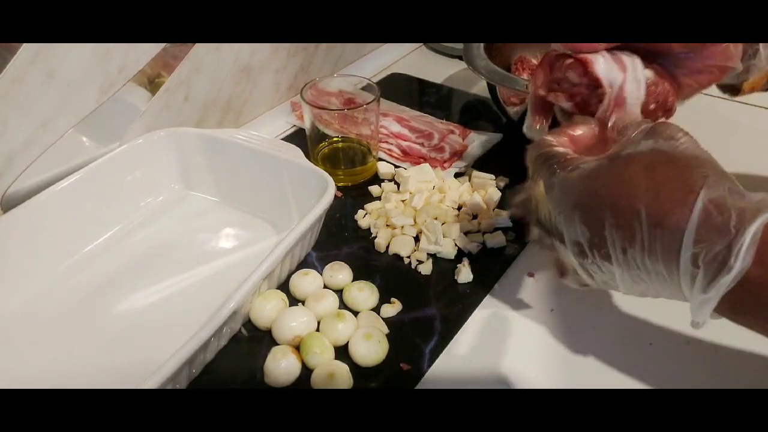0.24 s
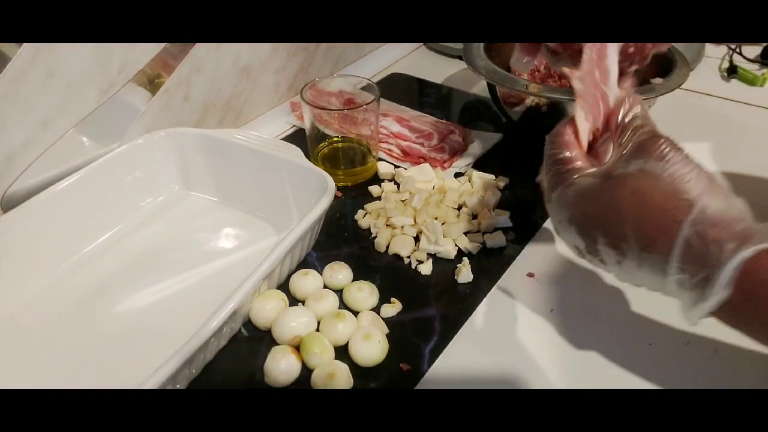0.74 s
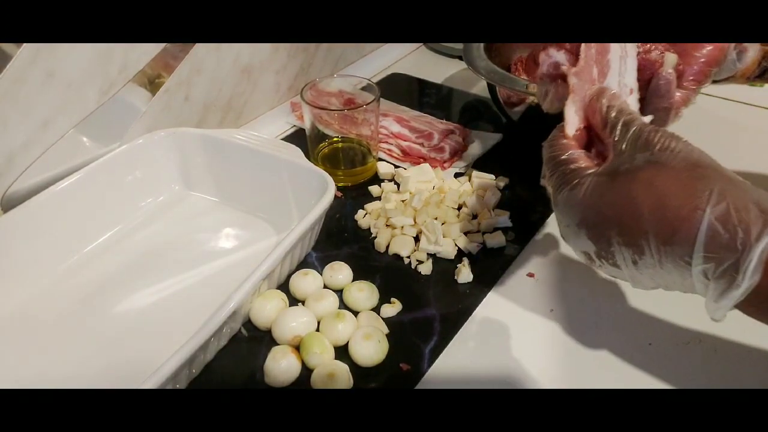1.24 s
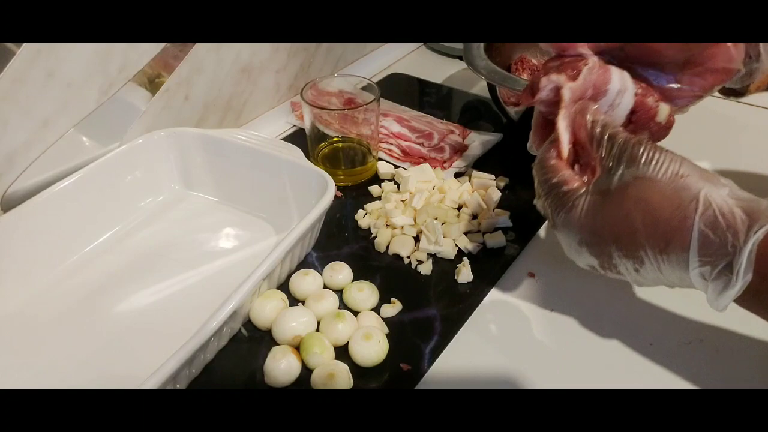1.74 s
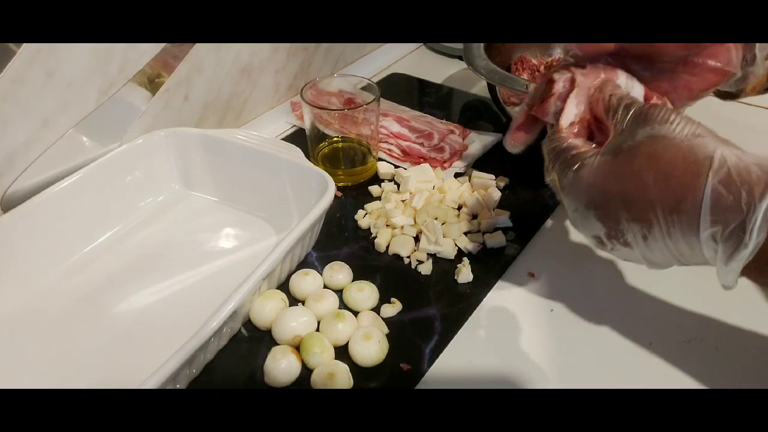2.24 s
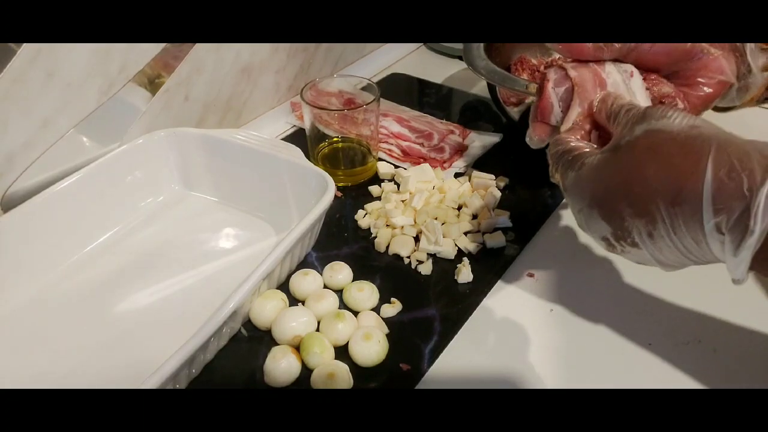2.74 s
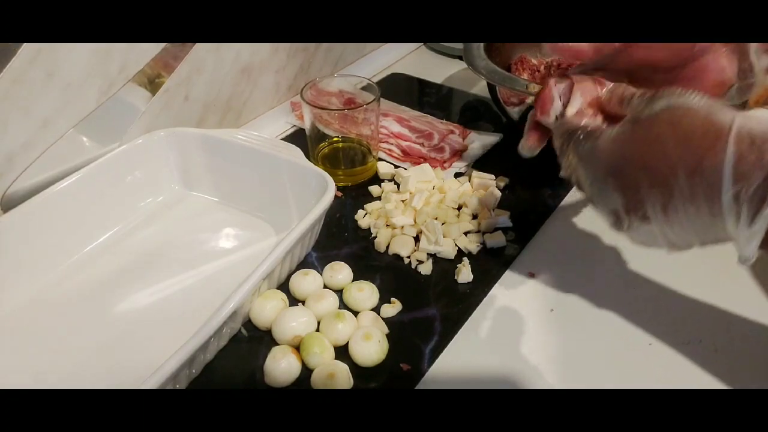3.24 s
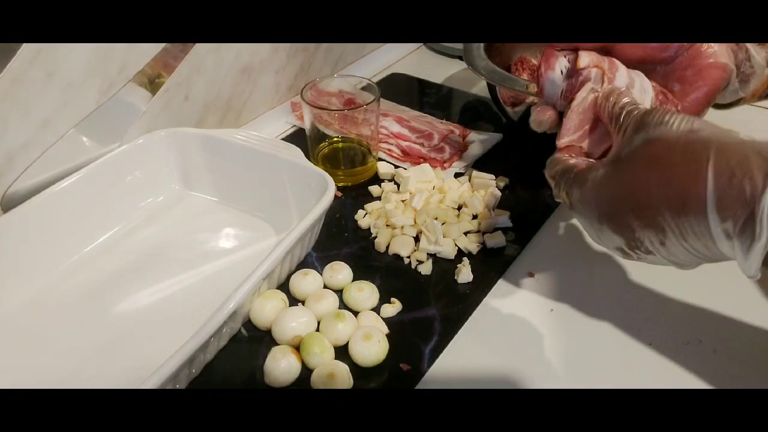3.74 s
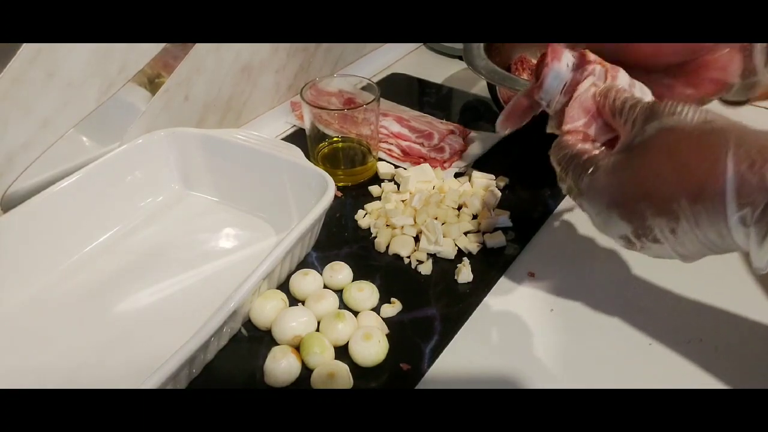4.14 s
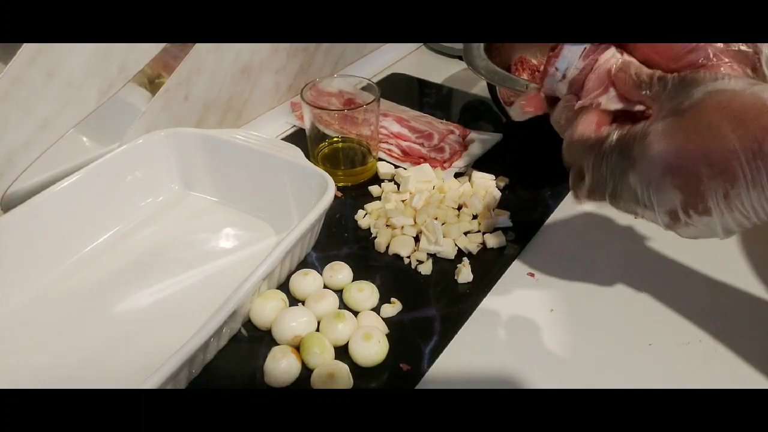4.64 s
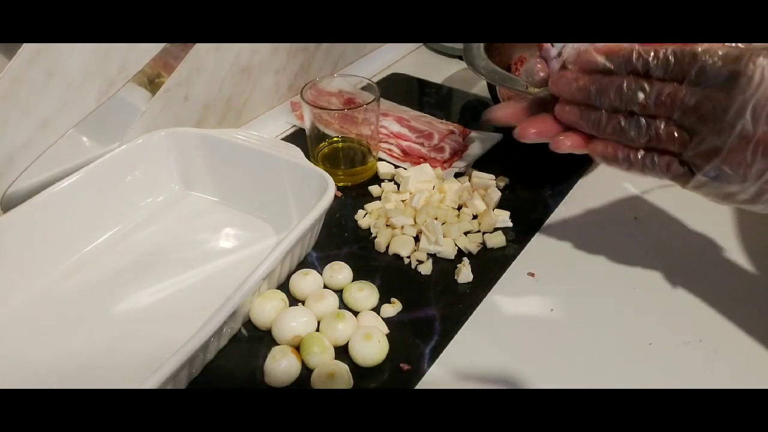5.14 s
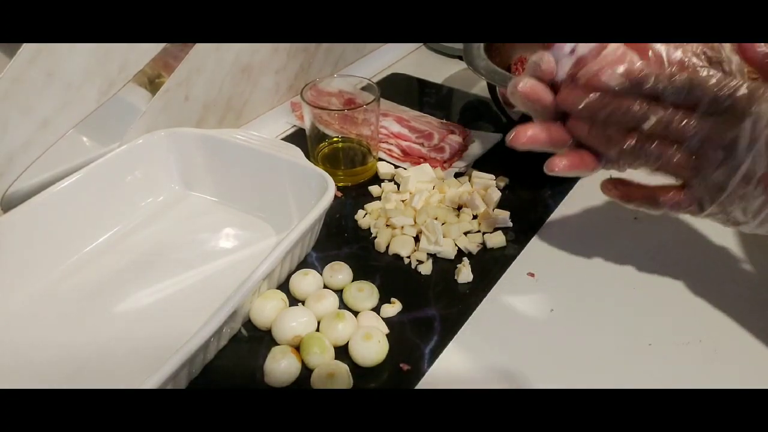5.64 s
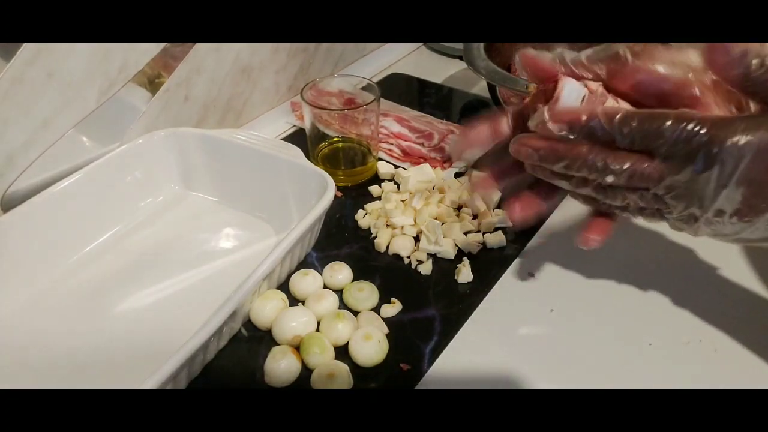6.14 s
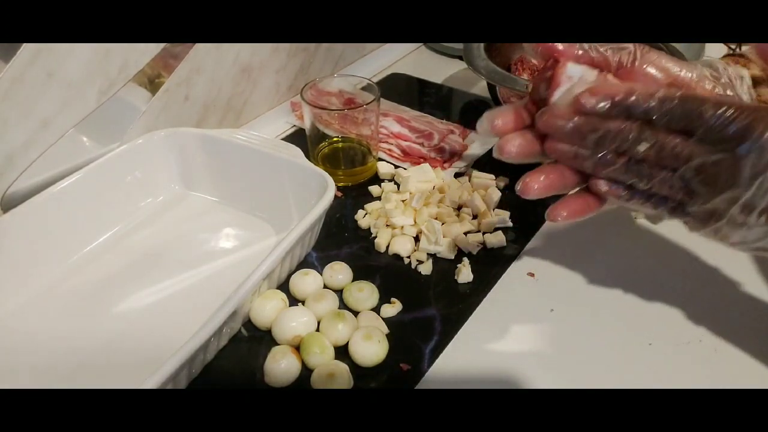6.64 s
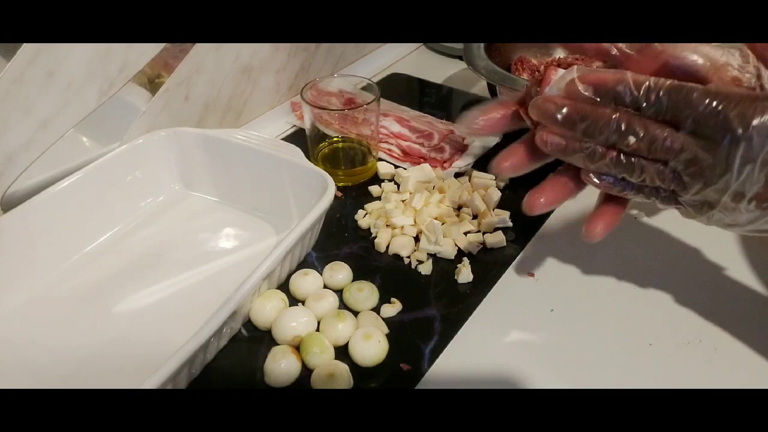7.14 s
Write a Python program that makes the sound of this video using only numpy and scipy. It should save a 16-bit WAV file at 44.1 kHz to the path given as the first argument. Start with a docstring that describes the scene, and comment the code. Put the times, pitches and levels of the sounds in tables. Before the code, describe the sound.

Close, thin disposable gloves crinkle in short irregular bursts as hands work raw meat. Sparse ticks and sharp snaps come first, then denser rustling. Around three seconds a low rumble swells into a muffled double thump through the counter. Busier crackling follows, with faint wet slips and dull palm pats. Small hard kitchen, close stereo microphones, faint hiss.

```python
"""At a kitchen counter, hands in thin plastic gloves press and turn raw meat. The creasing film is made
of swarms of tiny damped sines, with denser bursts for the loud snaps and longer rings for wet squelches.
Soft pats are dull pulses. A rumble, random noise through the counter's resonances, swells to a muffled thump.
Two spaced microphones with unlike treble hear it in a small hard room, over a faint hiss."""
import sys
import numpy as np
from scipy import signal
from scipy.fft import rfft, irfft, next_fast_len
from scipy.io import wavfile
from scipy.ndimage import map_coordinates

SR = 44100
rng = np.random.default_rng(int(sys.argv[2]) if len(sys.argv) > 2 else 0)


def to_wav(sig):
    """Store sig (one row per channel, or 1-D mono) as 16-bit WAV at the path in sys.argv[1].

    Samples outside -1..1 are clipped; the rate is SR.
    """
    pcm = np.clip(np.atleast_2d(sig), -1, 1) * 32767
    pcm = np.round(pcm).astype(np.int16)
    wavfile.write(sys.argv[1], SR, pcm.T)  # frames by channels


N = 326340  # length in samples


def amp(db):
    """Turn dB into a gain."""
    return 10 ** (np.asarray(db) / 20)


def unit(x):
    """Scale a sound to rms 1."""
    return x / np.sqrt(np.mean(x ** 2) + 1e-20)


def along(points, hz):
    """Read a curve of (Hz, value) points on a log frequency axis."""
    f, value = np.transpose(points)
    return np.interp(np.log(hz + 1), np.log(f + 1), value)


def wobble(rate, t):
    """A smooth random curve with `rate` knots a second."""
    return map_coordinates(rng.standard_normal(2000), [t * rate])


def patches(rate, s, octave):
    """A smooth random field over time (`rate` knots a second) and pitch (one knot per octave step)."""
    return map_coordinates(rng.standard_normal((400, 16)), [s * rate, octave])


def filtered(x, response):
    """Shape a sound by a complex response that depends on frequency."""
    size = next_fast_len(N + SR // 2)
    hz = np.fft.rfftfreq(size, 1 / SR)
    return irfft(rfft(x, size) * response(hz), size)[..., :N]


def grains(s, hz, gain, cycles, lag_s, size):
    """Add up damped sines that fade by 1/e in `cycles` turns and reach the left side lag_s after the right."""
    k = np.arange(size)
    sides = []
    for delay in (lag_s, 0 * lag_s):
        start = (s + delay) * SR
        first = np.clip(np.ceil(start).astype(int), 0, N)
        turns = (k + (first - start)[:, None]) * (hz / SR)[:, None]
        fade = np.exp(-turns / cycles[:, None])
        wave = gain[:, None] * np.sin(2 * np.pi * turns) * fade
        places = (first[:, None] + k).ravel()
        sides.append(np.bincount(places, wave.ravel(), N + size + 1)[:N])
    return np.array(sides)


def gestures(rows, t, rise, fall):
    """Power of three parts (level, level plus either column) as rows rise, hold and fall, in dB per s."""
    start, length, db, first_db, second_db = np.transpose(rows)
    before = rise * (start[:, None] - t)
    after = fall * (t - (start + length)[:, None])
    drop_db = np.maximum(0, np.maximum(before, after))
    return amp(2 * np.array([db, db + first_db, db + second_db])) @ amp(-2 * drop_db)


def parts(power):
    """Turn three powers into a level in dB and the other two relative to it."""
    db = 10 * np.log10(power)
    return db[0], db[1] - db[0], db[2] - db[0]


# The colour of the hiss. Each row: frequency in Hz, relative level in dB per Hz.
HISS_COLOUR = [(180, -6), (300, 1), (1150, -12.5), (1920, -9), (3260, -30), (4180, -16), (6540, -11),
               (9420, -12.5), (15800, -23.5)]


def hiss():
    """Steady air and circuit noise, unrelated between the microphones."""
    noise = rng.standard_normal((2, N))
    coloured = filtered(noise, lambda f: amp(along(HISS_COLOUR, f)))
    return amp(-71.5) * unit(coloured)  # rms in dB at the microphones


# How long the room rings. Each row: frequency in Hz, time to fall by 60 dB in seconds.
ROOM_DECAY = [(200, 0.07), (2000, 0.11), (10000, 0.016)]


def kitchen(x):
    """Each frequency of the room's answer dies at its own speed, unlike at the two microphones."""
    hz, t, z = signal.stft(rng.standard_normal((2, SR // 2)), SR, nperseg=256)
    fade = amp(-60 * t / along(ROOM_DECAY, hz)[:, None])
    tail = signal.istft(z * fade, SR, nperseg=256)[1]
    tail = tail / np.linalg.norm(tail[0])
    late = np.pad(x, ((0, 0), (130, 0)))  # the answer starts 130 samples after the sound
    return signal.fftconvolve(late, tail, axes=1)[:, :N]


# The rumble that never stops. Each row: time in seconds, level in dB before a random wobble,
# deep part in dB relative to that level, upper resonances in dB relative to that level.
STEADY_RUMBLE = [(0, -72, 1, -0.5), (2.3, -69, 3.5, 0), (4.2, -59.5, -6.5, 2.5), (5.3, -61, -2.5, 2),
                 (7.4, -65, -4, 1)]


def rumble(t):
    """Power of the steady shaking: it drifts between the rows and wobbles at random."""
    s, *columns = np.transpose(STEADY_RUMBLE)
    db, deep_db, upper_db = [np.interp(t, s, column) for column in columns]
    db = db + 2.4 * wobble(6, t)
    return amp(2 * np.array([db, db + deep_db, db + upper_db]))


# Pressing that shakes the counter. Each row: start in seconds, length in seconds, level in dB,
# deep part in dB relative to that level, upper resonances in dB relative to that level.
PRESSES = [(2.45, 0.087, -46.5, -2.5, -5.5), (2.62, 0.28, -56.5, 1, -7), (3.0, 0.2, -39.5, -19, -1.5),
           (3.13, 0.19, -35, -16, 0.5), (3.47, 0.1, -37.5, -13, 3.5), (3.64, 0.085, -52.5, 6, 7),
           (4.37, 0.14, -52.5, -7.5, -1.5)]


def surges(t):
    """Power of the presses: each rises by 270 dB per s, holds, and falls by 125 dB per s."""
    return gestures(PRESSES, t, rise=270, fall=125)


# The counter's resonances. Each row: frequency in Hz, width in Hz, relative level in dB.
RESONANCES = [(116.2, 17.5, -0.5), (138.3, 10.87, 3), (152.6, 15.5, -8.5), (262, 35.7, -7.5),
              (300.8, 31.4, -7), (511, 52, -26.5), (587, 14.5, -26.5), (758, 120, -35)]


def resonances(f):
    """The counter's ringing as a sum of resonances with alternating sign."""
    total = 0
    for k, (centre, width, db) in enumerate(RESONANCES):
        shape = 1j * f * width / (centre * centre - f * f + 1j * f * width)
        total = total + (-1) ** k * amp(db) * shape
    return total


# The colour of the deepest rumble. Each row: frequency in Hz, relative level in dB per Hz.
DEEP_COLOUR = [(22, -37), (45, -8.5), (130, -17.5)]


def deep_rumble():
    """Noise below 200 Hz, partly shared by the two microphones."""
    noise = rng.standard_normal((1, N)) + 0.51 * rng.standard_normal((2, N))
    return unit(filtered(noise, lambda f: amp(along(DEEP_COLOUR, f)) * (f < 200)))


def counter():
    """Lumpy random forces drive the counter's resonances; both microphones feel nearly the same."""
    t = np.arange(N) / SR
    level_db, deep_db, upper_db = parts(surges(t) + rumble(t))
    lumps = amp(1.92 * wobble(22, t))
    shared_force = lumps * rng.standard_normal((1, N))
    own_force = lumps * rng.standard_normal((2, N))

    def shared_response(f):
        lag_s = np.array([[.0002], [0]])  # left hears it later
        return resonances(f) * np.exp(-2j * np.pi * f * lag_s)

    def own_response(f):
        return resonances(f) * np.clip(f / 1000, 0, 1)  # the higher, the less alike

    body = unit(filtered(shared_force, shared_response) + filtered(own_force, own_response))
    upper = filtered(body, lambda f: f > 200)
    balanced = body + (amp(upper_db) - 1) * upper
    return amp(level_db) * (balanced + amp(deep_db) * deep_rumble())


# A palm on wet meat. Each row: start in seconds, level of one pulse in dB.
PALM_PATS = [(0.021, -54.5), (4.191, -53.5), (5.972, -55), (6.284, -58)]


def pats(count=14):
    """Each pat is a smear of dull, quickly damped pulses."""
    s, db = np.repeat(np.transpose(PALM_PATS), count, axis=1)
    draw = rng.random((len(s), 2))
    start = s + .024 * draw[:, 0]
    hz = 260 * 3.5 ** (draw[:, 1] ** 2)  # mostly near the low end
    return grains(start, hz, amp(db), 1.1 + 0 * s, .0002 + 0 * s, size=600)


# Wet film slipping over a pocket of air. Each row: start in seconds, length in seconds,
# central pitch in Hz, central level of one slip in dB.
WET_SLIPS = [(1.217, 0.11, 2450, -67), (1.436, 0.033, 3700, -62.5), (1.767, 0.084, 2110, -64.5),
             (3.033, .04, 7160, -44), (3.637, 0.028, 2380, -55.5), (6.941, 0.037, 6700, -52)]


def squelch(count=40):
    """Uneven slips ring the pocket for a few cycles around its pitch."""
    s, length, hz, db = np.repeat(np.transpose(WET_SLIPS), count, axis=1)
    draw, chance = rng.random(len(s)), rng.standard_normal((len(s), 2))
    pitch = hz * np.exp(.08 * chance[:, 0])
    gain = amp(db + 1.75 * chance[:, 1])
    return grains(s + length * draw, pitch, gain, 9.2 + 0 * s, .00008 + 0 * s, size=900)


# Single loud snaps. Each row: start in seconds, level in dB before the film colours it,
# central pitch of the shower in Hz.
LOUD_SNAPS = [(0.321, -43, 5490), (0.527, -39.5, 4440), (0.5822, -37.5, 6400), (0.862, -45.5, 6600),
              (0.9353, -55, 6200), (1.2743, -54, 5370), (1.4791, -41.5, 6100), (1.482, -43.5, 6100),
              (2.5197, -46, 3100), (2.945, -66, 9500), (3.177, -41, 7490), (3.238, -49, 4400),
              (3.4034, -49.5, 2470), (3.4273, -42.5, 4530), (3.4469, -34.5, 4800), (3.71, -46, 4940),
              (4.1994, -43.5, 2280), (4.6865, -45, 6910), (5.9738, -37, 2210), (6.2553, -31, 1670),
              (6.2896, -42.5, 5070), (6.3445, -44, 2840), (6.3984, -42.5, 2160), (6.7451, -35.5, 6500),
              (6.8608, -47.5, 7100), (6.9817, -36, 6630), (7.0536, -38.5, 7000), (7.237, -43.5, 2500),
              (7.3422, -47.5, 8500)]


def snaps(count=30):
    """A taut fold lets go: a broad sharp crack, then a short shower of smaller creases around its pitch."""
    s, db, hz = np.repeat(np.transpose(LOUD_SNAPS), count, axis=1)
    draw, chance = rng.random((len(s), 2)), rng.standard_normal((len(s), 2))
    late = .006 * draw[:, 0] ** 2.2  # seconds after the start
    centre_hz = np.where(late < .001, 4800, hz)  # the crack comes in the first millisecond
    pitch = np.clip(centre_hz * np.exp(.42 * chance[:, 0]), 1200, 12000)
    gain = amp(db - 60 * late / .016 + chance[:, 1])
    return grains(s + late, pitch, gain, 1.4 + 2 * draw[:, 1], .00008 + 0 * s, size=200)


# Each squeeze or rub of the gloves. Each row: start in seconds, length in seconds, level in dB,
# large folds in dB relative to that level, fine crinkle in dB relative to that level.
GLOVE_STROKES = [(.016, 0.017, -45, 8.5, 0), (.275, 0.019, -46.5, -32, -2.5), (.33, 0.011, -52.5, 6, 0),
                 (.42, 0.18, -60.5, 3.5, 4), (.6, 0.2, -65, 5.5, -4.5), (.88, 0.097, -64, 6, -2),
                 (1.25, 0.055, -62.5, -10, 4.5), (1.45, 0.097, -61.5, 5, -1.5), (1.59, 0.053, -60, 6.5, 4),
                 (1.7, 0.023, -52.5, 2, 2), (1.82, 0.032, -56.5, 1, 5), (2.0, .08, -61.5, 0, 2),
                 (2.09, 0.024, -51.5, -6, 5), (2.14, 0.088, -50, 8.5, 7.5), (2.296, 0.053, -53, 0, 8.5),
                 (2.52, 0.047, -56.5, 10.5, -15), (2.8, 0.019, -63, 11, -26), (2.955, 0.11, -53.5, 8.5, 11),
                 (3.1, .23, -60, 10, 1), (3.452, 0.01, -53.5, 11, -8), (3.58, 0.068, -56.5, -1, -3),
                 (3.715, 0.018, -59.5, 18, -2), (3.77, .11, -45.5, 8, 4), (3.93, 0.066, -52, 12, 11),
                 (4.07, 0.064, -56, 7.5, 10.5), (4.19, 0.051, -64.5, 23, 6), (4.29, 0.11, -68, -22, -4),
                 (4.59, 0.044, -63, 7.5, -3), (4.685, 0.07, -59, 13, -5), (4.79, 0.13, -51.5, 13, 7.5),
                 (4.96, 0.025, -48, 7, 4.5), (5.1, 0.094, -57, 7, 4.5), (5.22, 0.025, -48.5, 13, 4),
                 (5.37, 0.081, -50.5, 7, 0), (5.47, 0.043, -49.5, 5.5, 7.5), (5.555, 0.069, -45, 5.5, 2.5),
                 (5.81, 0.073, -50, 7.5, 0.5), (5.93, 0.058, -56.5, 14.5, 13), (6.02, 0.031, -47.5, 9.5, 6),
                 (6.08, 0.23, -54, 13.5, 3), (6.38, 0.075, -58, 11, 4.5), (6.56, 0.08, -56.5, 13, 9.5),
                 (6.68, 0.025, -47, -28, 0), (6.742, 0.0062, -54.5, 10, 6), (6.95, 0.049, -44, 9, 2.5),
                 (7.065, 0.034, -48.5, 13.5, 12), (7.2, 0.059, -71.5, 25.5, -17)]


def handling(s):
    """Level, folds and crinkle at times s: strokes, their settling and the idle film add up."""
    t = np.arange(0, N / SR + .002, .002)
    rise, fall, settle_fall = 484, 420, 52  # dB per s
    strokes = gestures(GLOVE_STROKES, t, rise, fall)
    # released film keeps ticking, 13.5 dB under the stroke
    settling = amp(2 * -13.5) * gestures(GLOVE_STROKES, t, rise, settle_fall)
    idle = amp(2 * -78)  # the film between strokes
    return [np.interp(s, t, part) for part in parts(strokes + settling + idle)]


def rustle(count=70000):
    """Creases of all sizes buckle in clumps; a small crease snaps high, a large fold low."""
    draw, chance = rng.random((count, 3)), rng.standard_normal((count, 2))
    s = draw[:, 0] * N / SR
    hz = 1000 + 14800 * draw[:, 1] ** 1.3
    work_db, fold_db, fine_db = handling(s)
    low = np.clip(np.log2(4200 / hz), 0, 1)  # share of large folds
    high = np.clip(np.log2(hz / 6500) * 0.87, 0, 1)  # share of fine crinkle
    db = work_db + low * fold_db + high * fine_db
    db = db + 2.72 * patches(12, s, 2.37 * np.log2(hz / 900))  # each fold has its own colour
    db = db + 1.1 * wobble(35, s) + .7 * wobble(150, s)  # clumps
    db = db - 1.2 * (1 - high) * np.log(1 - draw[:, 2])  # a few creases are far stronger
    cycles = 2.9 * np.exp(.4 * chance[:, 0])
    lag_s = .00008 + .0001 * chance[:, 1]  # fingers lie at different bearings
    gain = amp(db) * np.sqrt(hz / 5000 / cycles)
    return grains(s, hz, gain, cycles, lag_s, size=56)


# The colour of the plastic film. Each row: frequency in Hz, gain in dB.
FILM_COLOUR = [(500, -23.5), (1200, -19.5), (2200, -6), (3500, -1), (5000, 5.5), (6300, 7), (10000, 5.5),
               (13000, -0.5), (16000, -6)]


def film(creases):
    """The thin film passes some pitches of its creases more strongly than others."""
    return filtered(creases, lambda f: amp(along(FILM_COLOUR, f)))


def scene():
    """Gloves in the room, over counter and hiss."""
    gloves = film(rustle() + snaps()) + squelch() + pats()
    room = amp(-8) * kitchen(gloves)
    return gloves + room + counter() + hiss()


# The left microphone against the right. Each row: frequency in Hz, gain in dB.
LEFT_COLOUR = [(130, -1.8), (300, -2.8), (600, -.5), (1500, -6), (2500, -5), (4100, 1), (5000, -6),
               (6300, -2.5), (7100, 2.5), (8300, -10.5), (9800, -15.5), (11000, -14), (14000, -2.5)]


def record(dry):
    """The left port peaks near 7 kHz and dips above; nothing passes over the band limit."""
    def ports(f):
        left = amp(along(LEFT_COLOUR, f))
        return np.array([left, np.ones_like(f)]) * (f < 15850)  # band limit in Hz

    return filtered(dry, ports)


dry = scene()
out = record(dry)
to_wav(out)
```